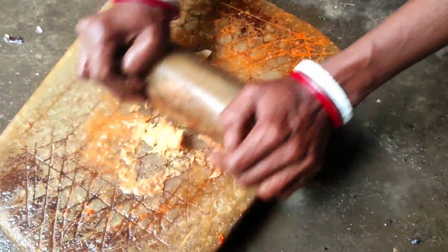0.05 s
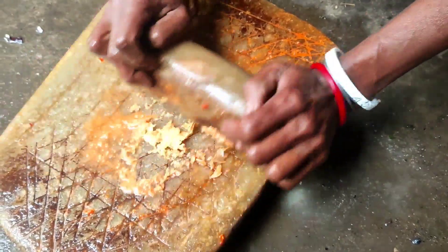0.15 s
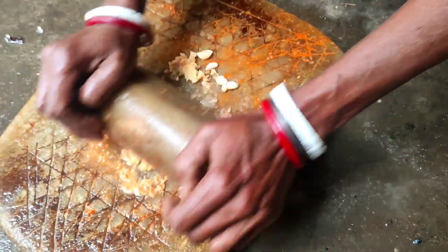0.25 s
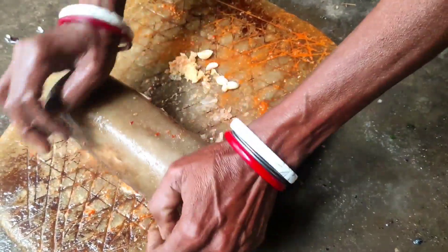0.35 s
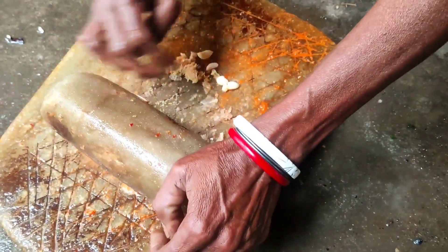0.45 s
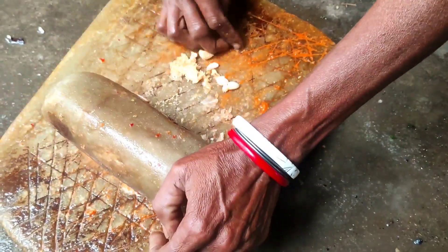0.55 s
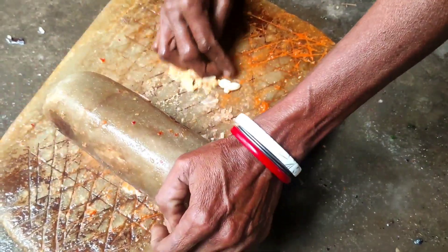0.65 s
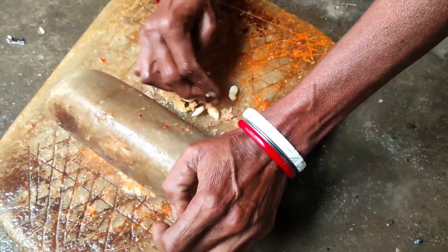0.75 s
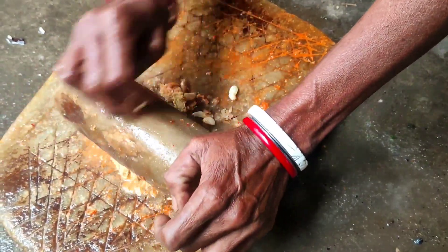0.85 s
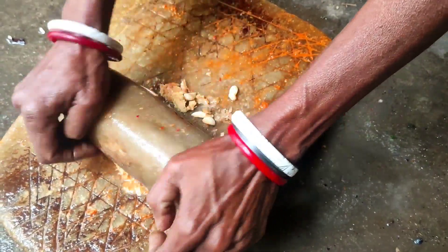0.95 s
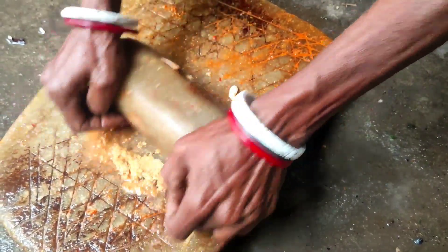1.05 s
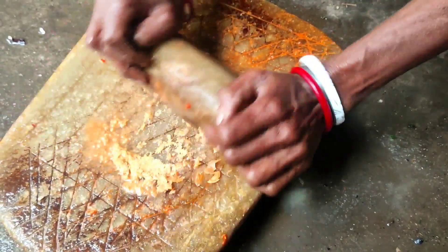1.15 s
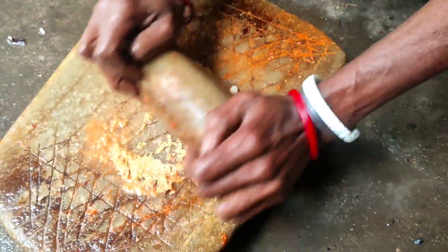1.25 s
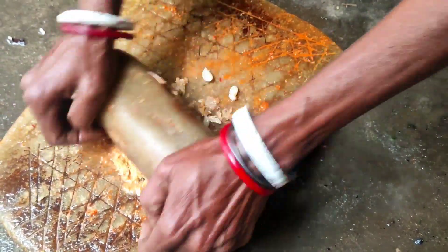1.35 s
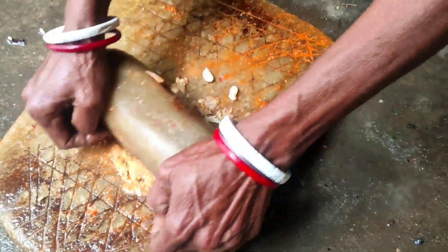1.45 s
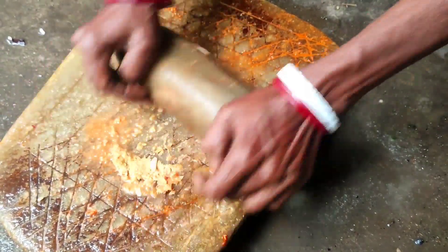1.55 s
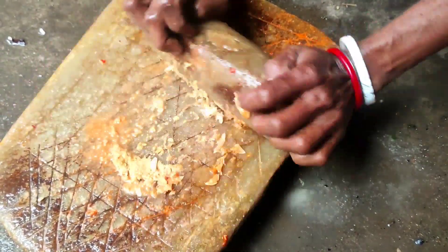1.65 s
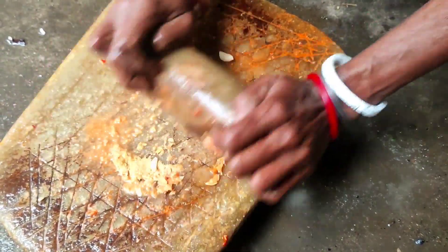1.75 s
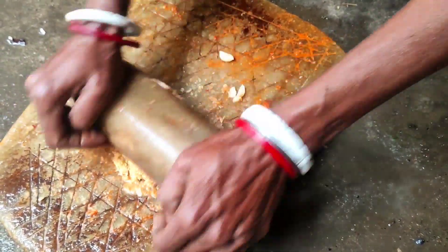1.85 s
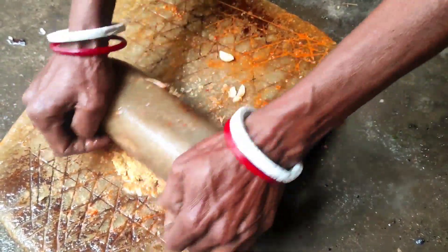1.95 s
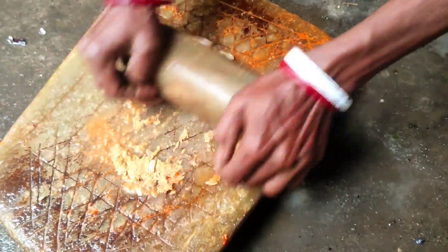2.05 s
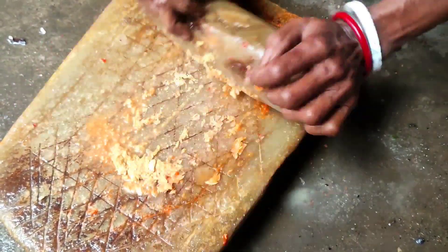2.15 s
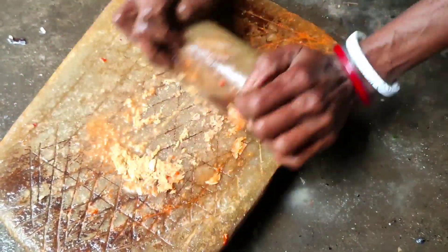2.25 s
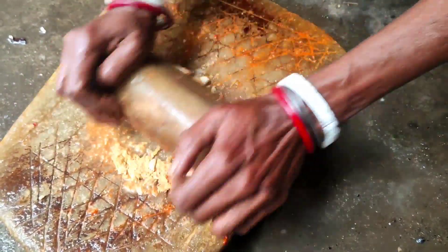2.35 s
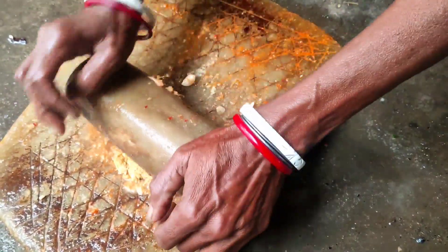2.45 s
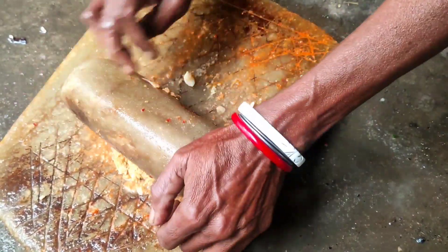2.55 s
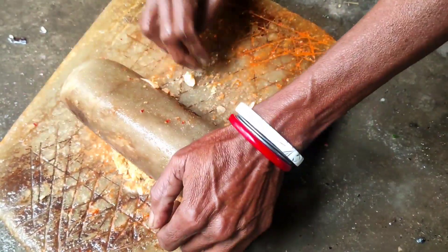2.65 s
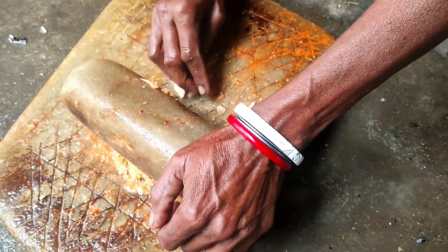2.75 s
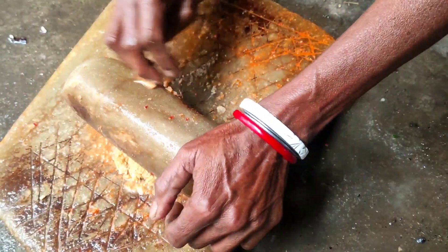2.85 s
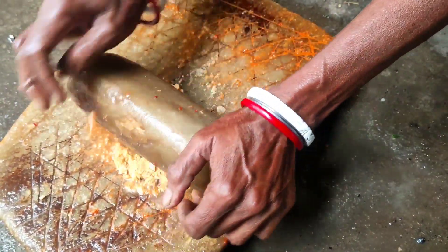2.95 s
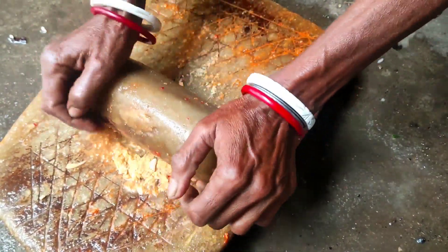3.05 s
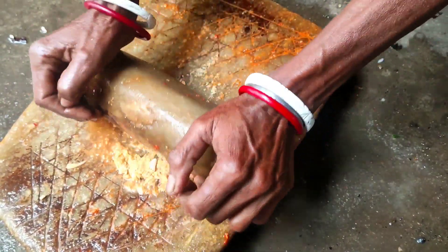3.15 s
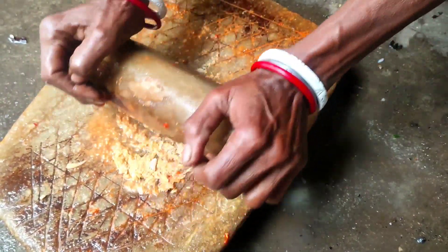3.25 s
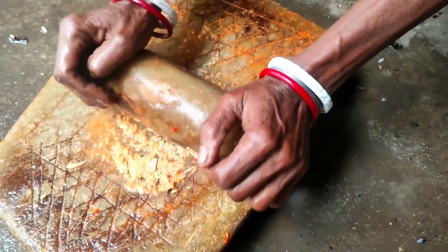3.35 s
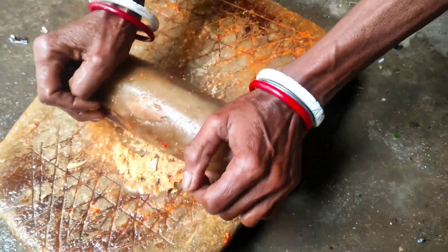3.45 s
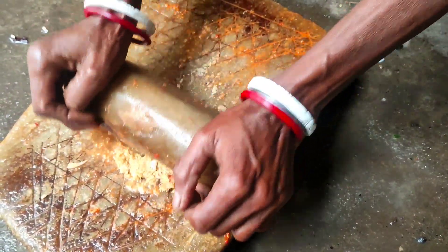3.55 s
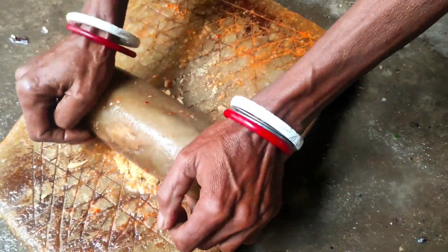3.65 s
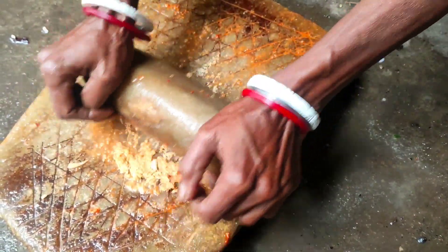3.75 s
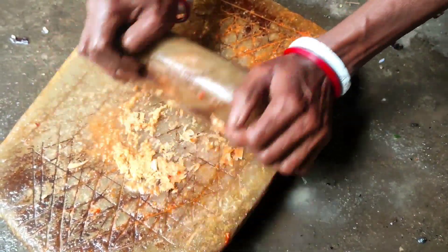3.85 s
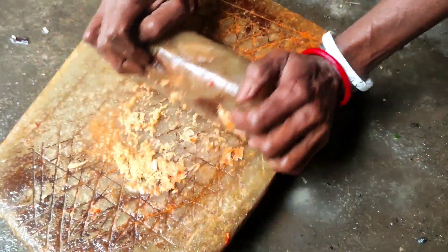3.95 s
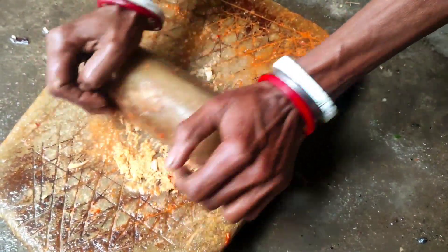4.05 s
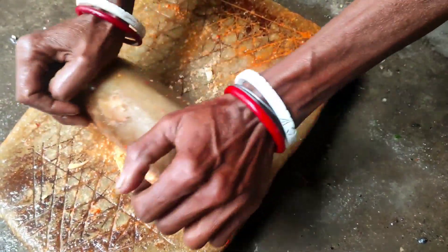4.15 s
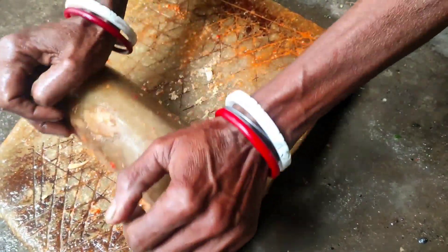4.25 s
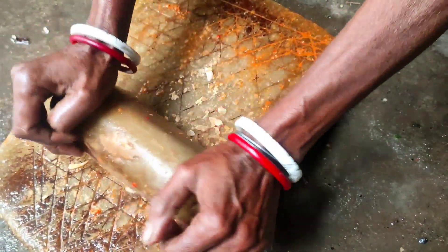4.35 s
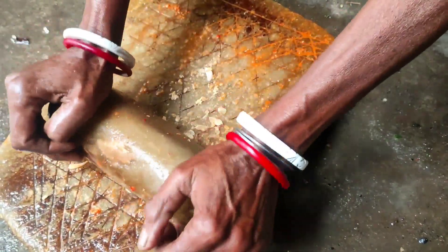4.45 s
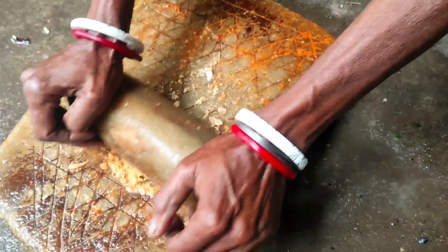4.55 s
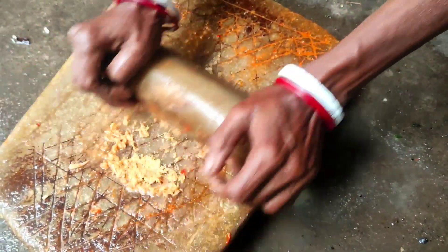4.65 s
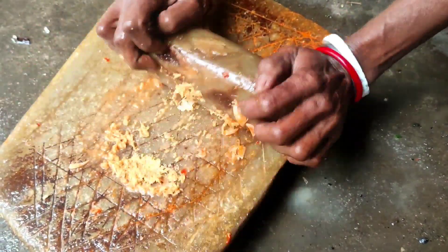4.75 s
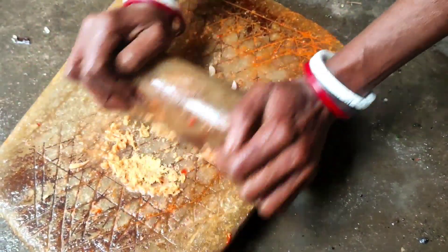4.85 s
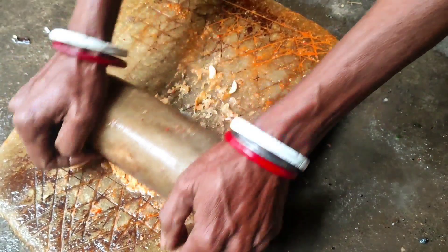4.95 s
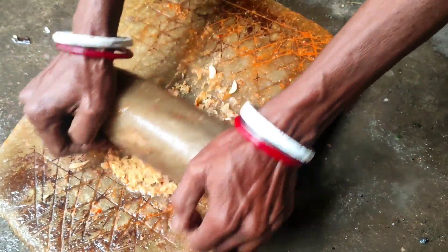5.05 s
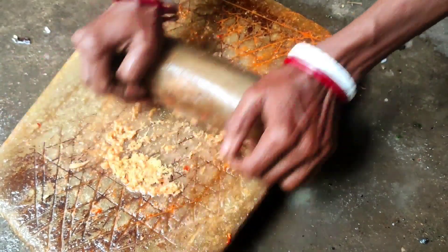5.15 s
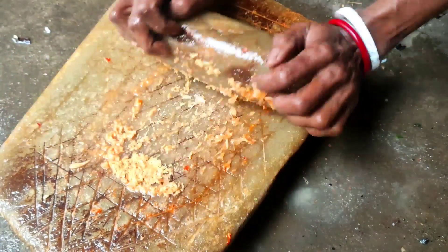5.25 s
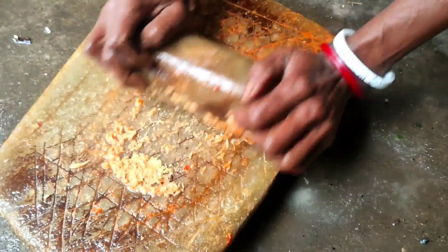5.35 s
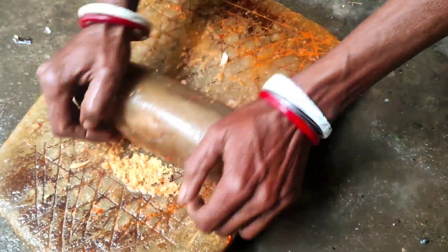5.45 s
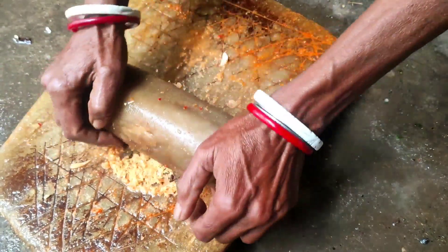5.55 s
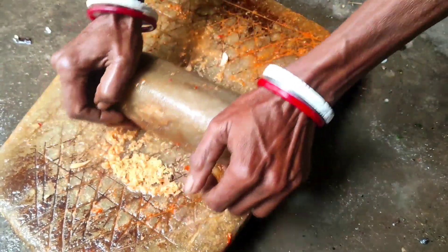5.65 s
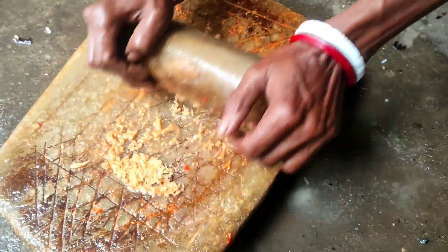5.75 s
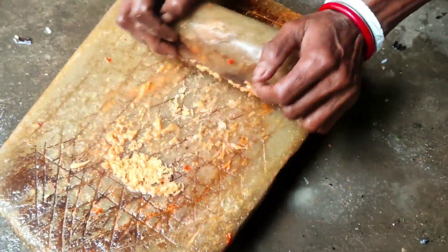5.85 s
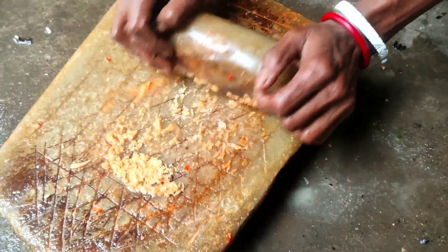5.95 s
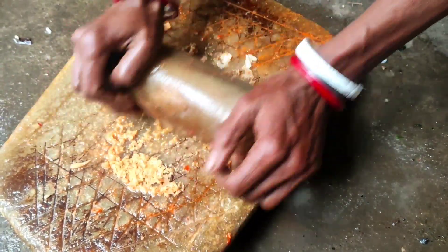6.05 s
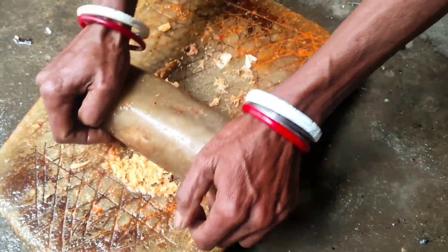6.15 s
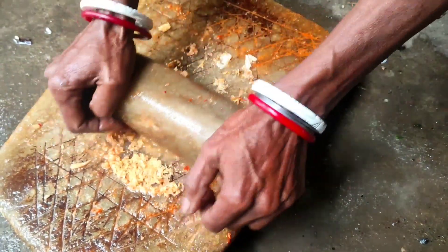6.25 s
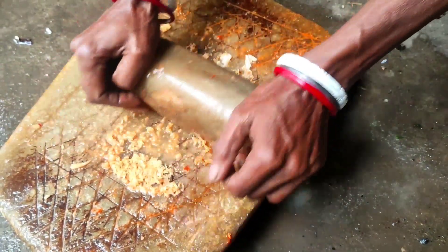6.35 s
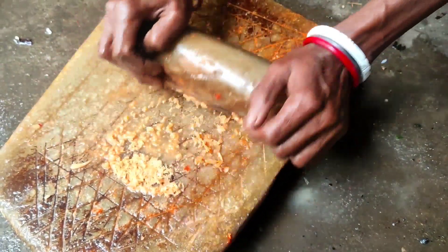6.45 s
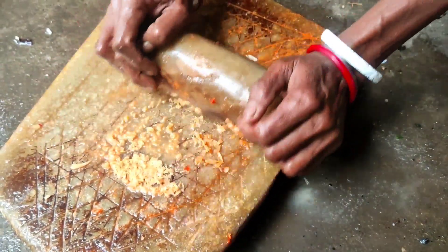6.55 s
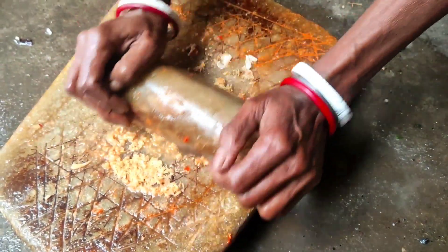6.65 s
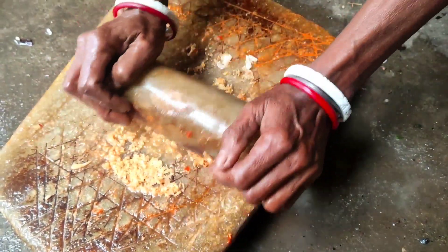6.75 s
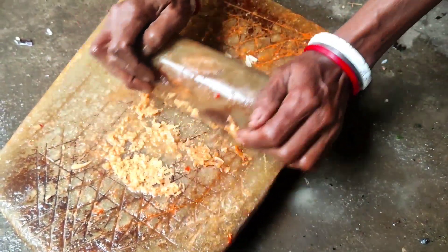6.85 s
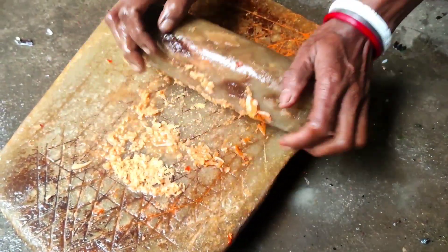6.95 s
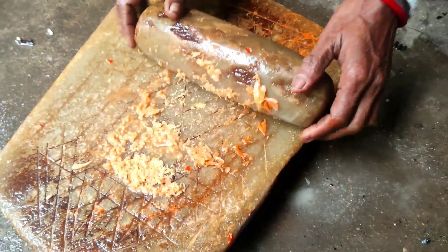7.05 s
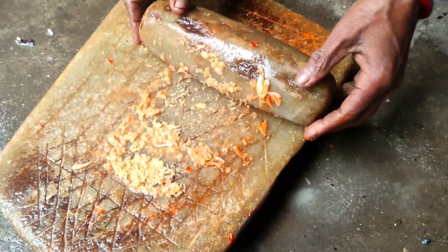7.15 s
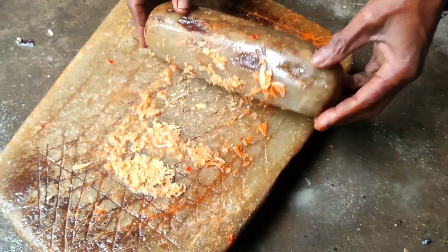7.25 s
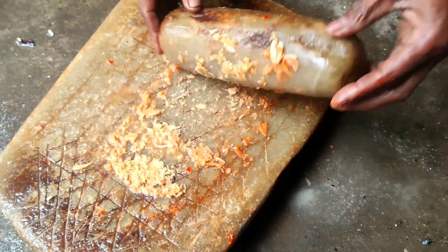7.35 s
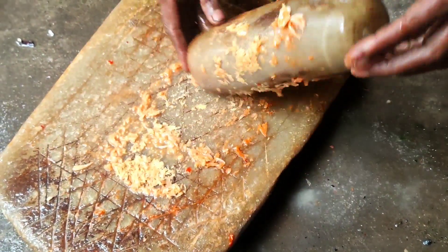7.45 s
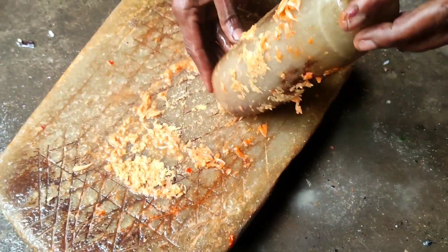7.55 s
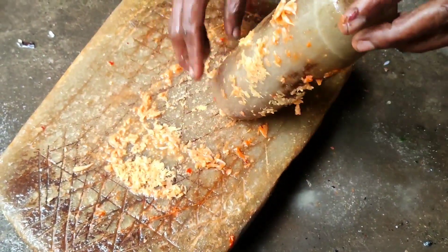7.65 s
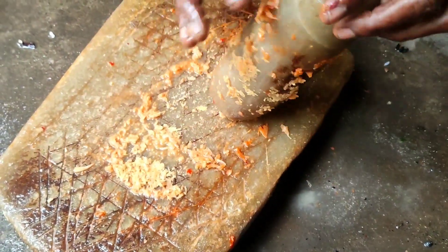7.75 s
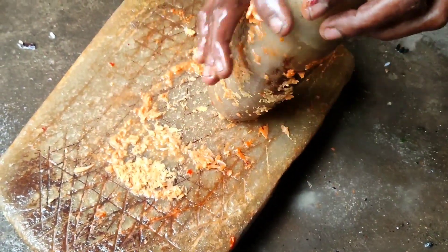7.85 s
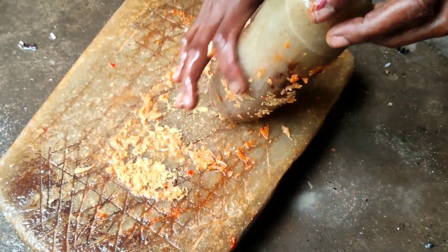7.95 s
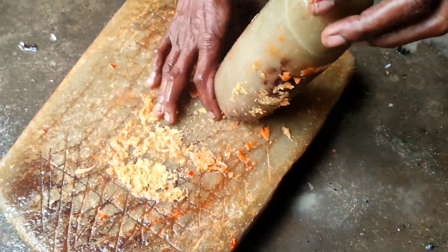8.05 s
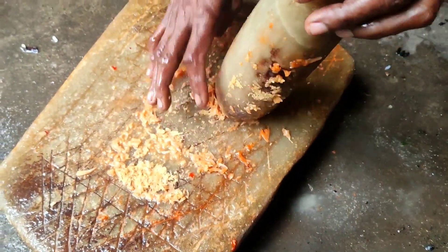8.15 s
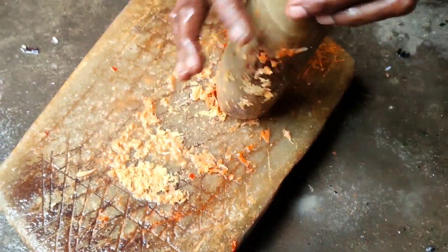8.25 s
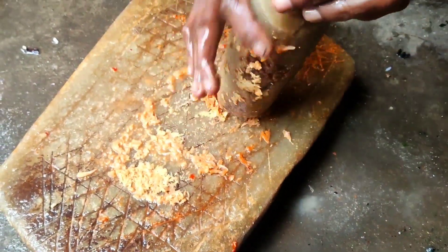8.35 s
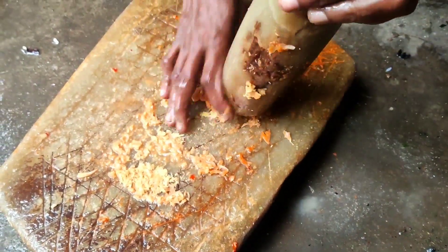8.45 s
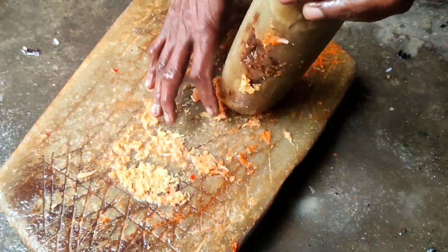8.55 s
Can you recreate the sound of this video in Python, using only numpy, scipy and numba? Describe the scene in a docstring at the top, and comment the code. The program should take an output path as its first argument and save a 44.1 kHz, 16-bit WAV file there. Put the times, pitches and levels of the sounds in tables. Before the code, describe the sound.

Close stereo pickup of spices being crushed on a stone slab in a small kitchen. A soft hiss and faint scrape open, then short dry stone clacks come unevenly, with gritty rubbing between them and thin bright rattles of bangles. The hardest knocks fall in the first half; later the wet grinding grows longer and fuller, with a few isolated clacks.

```python
"""A soft room hiss is heard first, with a faint scrape already under way in it.
Then a stone roller, pushed to and fro over a grooved stone slab on a kitchen floor, knocks down on the
slab, bumps over lumps of spice and scrapes through wet grit; bangles rattle on both wrists.
Knocks are damped wavelets that ring stone modes, the scrape is dense clicks through spectra and moving
resonances, the bangles are swarms of ticks through narrow modes; two spaced ports hear them close by."""
import sys
import numpy as np
from scipy import signal
from scipy.fft import rfft, irfft, next_fast_len
from scipy.io import wavfile
from numba import njit

SR = 44100
rng = np.random.default_rng(int(sys.argv[2]) if len(sys.argv) > 2 else 0)


def to_wav(sig):
    """Store sig (one row per channel, or 1-D mono) as 16-bit WAV at the path in sys.argv[1].

    Samples outside -1..1 are clipped; the rate is SR.
    """
    pcm = np.clip(np.atleast_2d(sig), -1, 1) * 32767
    pcm = np.round(pcm).astype(np.int16)
    wavfile.write(sys.argv[1], SR, pcm.T)  # frames by channels


N = 379260   # length of the scene [samples]


def amp(db):
    """Logarithmic level: decibels to amplitude gain."""
    return 10 ** (np.asarray(db) / 20)


def rms_one(x):
    """Normalisation of power: scale to unit rms."""
    return x / np.sqrt(np.mean(x ** 2) + 1e-20)


def at_hz(points, hz):
    """Interpolation of a frequency table on a logarithmic axis."""
    points = np.array(points)
    return np.interp(np.log(hz + 1), np.log(points[:, 0]), points[:, 1])


def fft_grid(length):
    """Discrete spectrum: a fast transform size and the frequency of each bin [Hz]."""
    size = next_fast_len(length)
    return size, np.arange(size // 2 + 1) * SR / size


def colour(x, spectrum):
    """Linear filtering: weight a noise-like signal by a spectrum, then set its rms to 1."""
    size, hz = fft_grid(N)
    return rms_one(irfft(rfft(x, size) * amp(at_hz(spectrum, hz)), size)[..., :N])


def drift(rate_hz):
    """Low-pass random process: two equal poles on noise at every 40th sample, spread 1."""
    pole = np.exp(-80 * np.pi * rate_hz / SR)
    noise = rng.standard_normal(N // 40 + 2002)
    slow = signal.lfilter([1], [1, -2 * pole, pole * pole], noise)[2000:]
    return np.interp(np.arange(N) / 40, np.arange(len(slow)), rms_one(slow))


def grains(per_s, spread_db):
    """Shot noise: random clicks of uneven size and sign, rms 1."""
    sizes = amp(spread_db * np.minimum(rng.exponential(1, N), 5)) * rng.choice([-1, 1], N)
    return rms_one(sizes * (rng.random(N) < per_s / SR))


def scattered(make, alike):
    """Partial coherence: each port hears a common part and a part of its own."""
    alike = np.clip(alike, 0, 1)
    return np.sqrt(alike) * make() + np.sqrt(1 - alike) * np.array([make(), make()])


@njit
def resonate(x, hz, width_hz, sr):
    """Damped oscillator: a resonance whose centre and width may move, with peak gain 1."""
    y = np.zeros(len(x))
    for i in range(2, len(x)):
        r = np.exp(-np.pi * width_hz[i] / sr)
        drive = (1 - r * r) / 2 * (x[i] - x[i - 2])
        y[i] = drive + 2 * r * np.cos(2 * np.pi * hz[i] / sr) * y[i - 1] - r * r * y[i - 2]
    return y


def steady_resonance(x, hz, width_hz):
    """Constant damping: a resonance whose pitch may move while its width stays."""
    return resonate(x, hz, np.full(N, float(width_hz)), SR)


def add(out, s, sound, pan_db):
    """Superposition: place a sound in both channels, pan_db louder on the left."""
    i = round(s * SR)
    panned = amp([[pan_db / 2], [-pan_db / 2]]) * sound
    out[:, i:i + len(sound)] += panned[:, :N - i]


# Spectrum of the room hiss: (frequency [Hz], relative density [dB per Hz])
HISS_SPECTRUM = [(20, 30), (60, 3), (200, 1), (427, -2.5), (775, -6.5), (1100, -10), (1940, -6),
                 (3520, -9.5), (4250, -8.5), (7110, -13), (8140, -22.5), (14000, -24), (16000, -39.5)]
# Correlation of the hiss between the ports: (frequency [Hz], left-right likeness [1])
HISS_LIKENESS = [(50, 1), (400, 0.94), (1500, 0.12), (5000, 0.036)]
HISS_DB = -44.5   # mean level about which the hiss drifts


def hiss():
    """Diffuse field: noise for room air and far household hum, alike in both ports only in the bass."""
    size, hz = fft_grid(N)
    alike = np.clip(at_hz(HISS_LIKENESS, hz), 0, 1)
    mid, side = rfft(rng.standard_normal((2, size)))
    spectra = np.sqrt(1 + alike) * mid + np.sqrt(1 - alike) * side * [[1], [-1]]
    pair = irfft(spectra, size)[:, :N]
    return amp(HISS_DB + 1.6 * drift(4.8)) * colour(pair, HISS_SPECTRUM)


# Decay of the room's reflections: (frequency [Hz], reverberation time [s])
ROOM_T60 = [(100, 1), (700, 0.55), (2000, 0.44), (5000, 0.26), (12000, 0.28)]


def room(x):
    """Reverberation: dense noise that decays exponentially band by band, its own in each port."""
    size, hz = fft_grid(N + SR)
    t = np.arange(SR) / SR
    noise = rng.standard_normal((2, SR)) * np.clip(t / 0.03, 0, 1) ** 2   # builds up over 30 ms
    walls = 0
    for k, (_, t60) in enumerate(ROOM_T60):
        # each band fades into its neighbours
        share = at_hz([(other_hz, j == k) for j, (other_hz, _) in enumerate(ROOM_T60)], hz)
        walls = walls + share * rfft(noise * amp(-60 * t / max(t60, .05)), size)
    return irfft(rfft(x.mean(axis=0), size) * walls, size)[:, :N]


def in_time(rows):
    """Interpolation in time: columns of a curve at every sample."""
    s, *columns = np.transpose(rows)
    return [np.interp(np.arange(N) / SR, s, c) for c in columns]


def gliding(slips, rows, width_hz, widens):
    """Moving resonance: slips pass twice through a flickering pitch, at the level of its curve."""
    hz, db = in_time(rows)
    hz = hz * amp(widens * 2 * drift(24))
    width_hz = width_hz + widens * hz
    once = resonate(slips, hz, width_hz, SR)
    twice = resonate(once, hz, width_hz, SR) / np.sqrt(width_hz)
    return rms_one(twice) * amp(db + 1.2 * drift(30))


# A thin faint tone that comes and goes in the pauses:
# (time [s], pitch [Hz], level before the port gain [dB])
THIN_TONE = [(.48, 1450, -75), (.57, 1370, -46.5), (0.638, 1330, -61), (1.0, 1340, -67.5),
             (1.1, 1340, -95.5), (4.3, 550, -94), (4.35, 528, -55.5), (4.44, 556, -68), (4.46, 550, -91)]


def thin_tone(slips):
    """Resonance of fixed width: the slips sound a faint tone in the pauses."""
    return gliding(slips, THIN_TONE, 150, 0)


# The wedge of air under the roller: (time [s], pitch [Hz], level relative to the grind [dB])
AIR_WEDGE = [(0.06, 1400, -2.5), (.3, 1400, -37), (2.86, 1090, -20), (2.9, 1120, -14), (2.98, 1480, 1),
             (3.1, 2070, -21), (4.75, 1980, 1), (4.8, 1940, 1.5), (4.93, 1490, -22), (5.04, 1330, -1),
             (5.1, 962, -2), (5.135, 760, 0.5), (5.16, 543, -2.5), (5.2, 940, -6), (5.235, 772, 4.5),
             (5.26, 580, 0.5), (5.5, 705, -16), (6.2, 784, -19), (6.39, 730, -12), (6.45, 1050, 1.5),
             (6.49, 1300, -9), (6.6, 1285, -6), (6.62, 750, -5), (6.67, 570, -4), (6.75, 590, -4),
             (7.3, 890, -26), (7.661, 1400, -10), (7.8, 1200, -4.5), (7.85, 820, -11.5), (7.97, 880, 8),
             (8.1, 790, 0.5)]
# A higher resonance of the rub, which comes and goes:
# (time [s], pitch [Hz], level relative to the grind [dB])
UPPER_RESONANCE = [(4.9, 1980, -28), (4.95, 2060, -22), (5.05, 1760, 2.5), (5.12, 2030, -13),
                   (6.2, 2280, -10), (6.31, 2250, -2.5), (6.4, 2010, -9), (6.53, 2470, 0.5), (6.6, 2490, 6),
                   (6.68, 2350, -8), (7.28, 2000, -3.5), (7.66, 1920, -4), (7.72, 1830, 3.5),
                   (7.77, 1920, -12), (7.9, 2070, -19)]
WEDGE_WIDTH_HZ, WEDGE_WIDENS = 170, .12   # width at no pitch; its growth per Hz, also the pitch flicker


def air_wedge(slips):
    """Cavity resonance: slips excite two pitches that glide with time."""
    return sum(gliding(slips, rows, WEDGE_WIDTH_HZ, WEDGE_WIDENS) for rows in (AIR_WEDGE, UPPER_RESONANCE))


def stone_hum(slips):
    """Modal excitation by friction: the rub wanders over the slab, so each mode comes and goes."""
    hum = np.zeros(N)
    for hz, _, _, _ in STONE_MODES[2:]:
        pitch_hz = hz * amp(0.083 * drift(2.0))
        hum += amp(5 * drift(13.1)) * steady_resonance(slips, pitch_hz, 50)
    return amp(-10) * rms_one(hum)


# Strokes of the roller: (start [s], length [s], hardest push [share of length],
# relative grind level [dB], relative grit level [dB])
STROKES = [(-0.15, 0.94, 0.12, -56.5, -52.5), (0.258, 0.6, 0.25, -52.5, -64),
           (1.055, 0.29, 0.52, -41.5, -52), (1.217, 0.83, 0.16, -58, -56), (1.593, 0.69, 0.8, -49, -47.5),
           (2.263, 0.56, 0.07, -49, -78), (2.855, 0.58, 0.24, -55.5, -62), (3.41, 0.17, 0.14, -43, -56.5),
           (3.661, 0.37, 0.35, -50.5, -52), (4.439, 0.37, 0.063, -41, -48.5), (4.653, 1, 0.28, -44, -49),
           (5.976, 0.6, 0.53, -44.5, -49.5), (6.296, 0.54, 0.45, -43, -45), (7.24, 0.76, 0.46, -44, -50.5),
           (7.592, 0.4, 0.31, -40, -50), (8.46, 0.3, 0.52, -53.5, -58.5)]
GRIND_SWELL, GRIT_SWELL = 1.65, 1   # exponents: how pointed the rise and fall of a stroke is
IDLE_GRIND_DB, IDLE_GRIT_DB = -68.5, -69   # hands and roller shifting between strokes


def strokes():
    """Addition of powers: each push swells and eases off over a faint idle shuffle; gives gains."""
    t = np.arange(N) / SR
    grind_power, grit_power = amp(2 * IDLE_GRIND_DB), amp(2 * IDLE_GRIT_DB)
    for s, length_s, hardest, grind_db, grit_db in STROKES:
        peak_s = s + np.clip(hardest, .05, .95) * length_s
        push = np.sin(np.pi / 2 * np.interp(t, [s, peak_s, s + length_s], [0, 1, 0])) ** 2
        grind_power = grind_power + amp(2 * grind_db) * push ** GRIND_SWELL
        grit_power = grit_power + amp(2 * grit_db) * push ** GRIT_SWELL
    return np.sqrt(grind_power), np.sqrt(grit_power)


def patchy(x):
    """Band-wise modulation: four treble bands swell and thin, each on its own."""
    edges_hz = [1000, 2500, 4000, 6000, 16000]
    out = 0
    for k, band in enumerate(zip(edges_hz, edges_hz[1:])):
        sos = signal.butter(2, band, "band", fs=SR, output="sos")
        # alternate signs let neighbours join
        out = out + (-1) ** k * amp(2.0 * drift(10.4)) * signal.sosfilt(sos, x)
    return out


# Spectrum of the low grind: (frequency [Hz], relative density [dB per Hz])
GRIND_SPECTRUM = [(100, -61), (180, -22.5), (600, -4.5), (1800, -0.5), (3000, -2.5), (4500, -14),
                  (8000, -66)]
# Spectrum of the fine wet crunch: (frequency [Hz], relative density [dB per Hz])
GRIT_SPECTRUM = [(1500, -42), (2900, -7.5), (4200, 2), (5200, -5.5), (6800, -4.5), (10000, -17.5),
                 (14000, -27)]


def scrape():
    """Stick-slip friction: dense slips make a grind that sounds air wedge and stone, and a fine crunch."""
    grind_gain, grit_gain = strokes()
    judder = drift(20)   # the roller catches on the grooves
    slips = grains(2500, spread_db=2.2)
    rub = colour(scattered(lambda: grains(3000, spread_db=2.0), 0.49), GRIND_SPECTRUM)
    grind = rub + air_wedge(slips) + stone_hum(slips)
    grind = grind * grind_gain * amp(1.3 * judder + 1.5 * drift(70))
    crunch = colour(scattered(lambda: grains(6000, spread_db=2.5), 0.076), GRIT_SPECTRUM)
    grit = patchy(crunch) * grit_gain * amp(1.2 * judder)
    return (grind + grit + thin_tone(slips)) * amp(0) * np.array(amp([[.6], [-.6]]))   # pan in dB


# Spectrum of the bangles' ticks: (frequency [Hz], relative density [dB per Hz])
TICK_SPECTRUM = [(880, -39), (1500, 9.5), (1870, -10.5), (2690, 11.5), (6760, 4), (12400, -8),
                 (16000, -10.5)]
# Bangles clash: (time [s], relative level [dB], dying away [s], brightness [dB])
CLASHES = [(0.363, -41, 0.083, -2), (0.387, -33, 0.021, 12), (0.6764, -49.5, 0.052, -5),
           (1.059, -45.5, 0.021, 3), (1.163, -30, 0.032, -4.5), (1.239, -28.5, 0.064, -8.5),
           (1.466, -33.5, 0.023, 14.5), (1.485, -36.5, 0.016, 7), (1.746, -32.5, 0.04, -5),
           (1.945, -39, 0.06, 12.5), (2.243, -35, 0.012, 0), (2.385, -34, 0.063, -6),
           (2.458, -39.5, 0.03, 0), (2.481, -43, 0.022, 18.5), (2.879, -44, 0.03, -4),
           (3.009, -34.5, 0.058, -11), (3.2274, -45, 0.013, 5), (3.4286, -34.5, 0.023, -4),
           (3.5707, -39.5, 0.015, 7.5), (3.672, -31, 0.028, -4), (4.0073, -33.5, 0.019, -1.5),
           (4.111, -42.5, 0.16, 1), (4.179, -35, 0.02, 7.5), (4.197, -31.5, 0.0094, 7),
           (4.4499, -20, 0.0075, -13), (4.63, -33, 0.019, 9.5), (4.8487, -43.5, 0.018, 10.5),
           (4.934, -39, 0.022, 5.5), (5.034, -36.5, 0.023, 5), (5.053, -33, 0.013, 12.5),
           (5.34, -35, 0.013, 5), (5.55, -34.5, 0.04, 7.5), (5.788, -47.5, 0.006, 5),
           (5.9658, -23.5, 0.0011, -3), (6.061, -40, 0.0049, 1), (6.216, -29.5, 0.014, 7.5),
           (6.635, -34, 0.018, -5.5), (6.779, -39.5, 0.021, 8), (6.802, -41.5, 0.05, -3),
           (7.256, -47.5, 0.022, 9), (7.5656, -37, 0.047, -40), (8.032, -45, 0.022, 4.5),
           (8.095, -47, 0.023, -14), (8.1374, -43.5, 0.0072, -8)]
# Ringing modes of the bangles: (frequency [Hz], width [Hz], relative level [dB])
BANGLE_MODES = [(4105, 52, 2.5), (5550, 21, 10), (6220, 58, 13), (6420, 40, 9.5), (6990, 64, 12.5),
                (9510, 120, -4.5), (10700, 130, -7.5), (12180, 310, 0.5),]
WRISTS_PAN_DB = 2   # left minus right
MELLOW_RING = 0.28   # dB gained by modes between 5 and 7.2 kHz for each dB that a clash is duller
FAVOUR_DB, SWING_DB = 5, .15   # spread of mode strength; of pitch, as bangles hang and touch differently


def bangles():
    """Impact-excited modes: each clash is a swarm of ticks around a sharp touch that rings the bangles."""
    source = scattered(lambda: grains(5000, spread_db=1.0), 0.29)
    ticks = colour(source, TICK_SPECTRUM) * amp(2.0 * drift(79))
    low = signal.sosfilt(signal.butter(4, 8500, fs=SR, output="sos"), ticks)
    high = signal.sosfilt(signal.butter(4, 8500, "high", fs=SR, output="sos"), ticks)
    dull, bright, mellow = np.zeros((3, 2, N))   # envelopes
    t = np.arange(-SR // 20, SR // 4) / SR
    touch = 0.6 * (t >= 0) * np.exp(-np.abs(t) / 0.0017)
    for s, db, fall_s, bright_db in CLASHES:
        fall_s = max(fall_s, .001)
        swell = touch + np.exp(np.where(t < 0, t / (0.28 * fall_s), -t / fall_s))
        mellow_db = db - 18.5 - MELLOW_RING * max(bright_db, -15)
        add(dull, s + t[0], amp(db - 9.5) * swell, WRISTS_PAN_DB)
        add(bright, s + t[0], amp(db - 3.5 + bright_db) * swell, WRISTS_PAN_DB)
        add(mellow, s + t[0], amp(mellow_db) * swell, WRISTS_PAN_DB)
    swarm = dull * low + bright * high
    out = swarm.copy()
    for hz, width_hz, db in BANGLE_MODES:
        exciter = mellow * low if 5000 < hz < 7200 else swarm
        struck = exciter * amp(db + 6.0 + FAVOUR_DB * drift(4.1))   # each clash favours other modes
        pitch_hz = hz * amp(SWING_DB * drift(4.0))
        out += [steady_resonance(port, pitch_hz, width_hz) for port in struck]
    return out


def wavelet(t, hz, damping):
    """Damped pulse: a few cycles that rise and die, without a net push; height 1."""
    shape = np.gradient(np.cos(2 * np.pi * hz * t) * (t * hz) ** 2 * np.exp(-2 * damping * t * hz))
    return -shape / np.abs(shape).max()


# Crowded modes of slab and roller, the low set off by the knock, the high by the clack:
# (frequency [Hz], crowd width [Hz], relative level [dB], reverberation time before added damping [s])
STONE_MODES = [(329, 70, -29.5, 0.16), (466, 91, -24.5, 0.13), (724.5, 82, -15, 0.097),
               (880, 73, -17, 0.058), (1400, 240, -15, 0.022), (1775, 39, -12.5, 0.025),
               (2078, 160, -22.5, 0.36), (2207, 65, -18.5, 0.056), (2374, 160, -14, 0.019),
               (2830, 58, -40, 0.061), (3610, 78, -44, 0.037)]
PARTIALS = 9   # in each crowd
AWAY_DB = 10   # a high mode loses this much for each octave from the clack's pitch
RING_RISE_S = 0.00089   # the modes build up behind the contact


def ringing(t, knock_db, clack_db, clack_hz):
    """Modal superposition: each crowd is nine scattered partials, scaled to the crowd's own strength."""
    hz, width_hz = np.repeat(np.transpose(STONE_MODES)[:2], PARTIALS, axis=1)[:, :, None]
    places = np.tile(np.linspace(-1, 1, PARTIALS), len(STONE_MODES))
    places = places + (rng.random(len(places)) - .5) / 4
    size, side = rng.random((2, len(hz), 1))
    partial_hz = hz + width_hz * places[:, None]
    partial = (1.7 + 0.1 * size) * np.sign(side - .5) * np.sin(2 * np.pi * partial_hz * t)
    crowds = partial.reshape(len(STONE_MODES), PARTIALS, -1).sum(axis=1)
    crowds = crowds / np.std(crowds[:, :SR // 12], axis=1, keepdims=True)
    hz, _, db, t60 = np.transpose(STONE_MODES)[:, :, None]
    high_db = clack_db - AWAY_DB * np.abs(np.log2(hz / clack_hz))
    struck_db = np.where(hz < 1100, knock_db, high_db)
    crowds = crowds * amp(db + struck_db - 60 * t / t60)
    # hands and paste damp the first ms hardest
    damping = 0.5 + np.exp(-t / 0.023)
    return crowds.sum(axis=0) * damping * (1 - np.exp(-(t / RING_RISE_S) ** 2))


def chatter(t, chatter_s):
    """Repeated impact: a first touch, weaker the longer the chatter, then a dying run of random ones."""
    chatter_s = max(chatter_s, .001)
    happens, strength = rng.random((2, len(t)))
    run = min(chatter_s / 0.034, 1.2) * np.exp(-(t / chatter_s) ** 2 / 2)
    touches = (happens < 1500 / SR) * (2 * strength - 1) * run
    touches[0] = 1 - min(chatter_s / 0.04, .85)
    touches[round(.0135 * SR)] += 0.21 * touches[0]   # a near wall throws the blow back
    return touches


# Roller on slab, levels before chatter shares them out: (time [s], knock level [dB],
# clack level [dB], clack pitch [Hz], thud level [dB], chatter [s])
KNOCKS = [(0.0639, -64, -32.5, 1620, -73, 0.019), (0.2792, -44.5, -46, 1550, -50, 0.018),
          (0.492, -63, -45, 1590, -57, 0.036), (1.1014, -26.5, -32.5, 1440, -42.5, 0.04),
          (1.145, -36, -47.5, 1860, -66, 0.034), (1.24, -9.5, -6.5, 1690, -21, 0.008),
          (1.5931, -33.5, -38.5, 1510, -42, 0.028), (1.6285, -27, -32, 1330, -31.5, 0.01),
          (1.7013, -10.5, -7.5, 1350, -22.5, 0.00092), (1.8385, -19, -3, 1690, -31, 0.0031),
          (2.134, -15, -15, 1744, -30, 0.0092), (2.202, -27, -27.5, 1620, -37.5, 0.024),
          (2.2908, -12, 3.5, 1850, -19.5, 0.0068), (2.3011, -15.5, -7, 1980, -45, 0.0068),
          (2.382, -40.5, -31, 1920, -48.5, 0.047), (2.8706, -54, -33, 1110, -71, 0.019),
          (3.017, -63, -21.5, 1720, -73, 0.015), (3.169, -47, -62, 1800, -27, 0.014),
          (3.4404, -12.5, -3.5, 1380, -21, 0.0055), (3.6695, -41, -31, 2200, -36.5, 0.019),
          (3.985, -18.5, -15, 1400, -28, 0.003), (4.13, -25.5, -27, 1260, -35, 0.004),
          (4.1677, -30.5, -31, 1390, -36, 0.018), (4.4486, -4, 3, 1630, -21.5, 0.004),
          (4.4641, -40, -10, 2000, -33, 0.002), (4.4755, -44, -19, 2100, -48, 0.0067),
          (4.876, -42, -55, 1500, -38, 0.011), (5.427, -36, -33.5, 1470, -45, 0.026),
          (5.9661, -19, 0.5, 1390, -24.5, 0.0009), (5.979, -40, -27, 2000, -46, 0.004),
          (6.0595, -52, -21, 2020, -43, 0.016), (6.12, -53, -60, 1500, -36, 0.0089),
          (6.9542, -17, -6.5, 1790, -24.5, 0.0087), (7.5841, -27.5, -30, 1640, -28, 0.0077)]
CLACK_DAMPING = 1.55
CRACK_DB = -3   # relative to the clack


def knocks():
    """Contact impact: thud, knock, clack and crack, repeated by chatter; every blow rings the stone."""
    out, t = np.zeros((2, N)), np.arange(SR // 3) / SR
    bright = signal.butter(2, [2800, 4500], "band", fs=SR, output="sos")
    for s, knock_db, clack_db, clack_hz, thud_db, chatter_s in KNOCKS:
        knock = amp(knock_db) * wavelet(t, 1075.0 / (1 + 10.0 * chatter_s), 1.29)
        clack = amp(clack_db) * wavelet(t, clack_hz, CLACK_DAMPING)
        thud = amp(thud_db) * (wavelet(t, 317.0, 1.62) + 0.14 * wavelet(t, 85.0, 2.46))
        burst = (rng.random(len(t)) - .5) * np.exp(-t / 0.0056)
        crack = amp(CRACK_DB + clack_db) * signal.sosfilt(bright, burst)
        blow = knock + clack + thud + crack + ringing(t, knock_db, clack_db, clack_hz)
        add(out, s, signal.fftconvolve(chatter(t, chatter_s), blow)[:len(t)], 1.1)
    return out


def ports(x, lag):
    """Propagation delay: the left channel lags by a table of (frequency [Hz], delay [ms])."""
    size, hz = fft_grid(N + SR // 10)
    turn = np.exp(-2j * np.pi * hz * at_hz(lag, hz) / 1000)
    late = irfft(rfft(x[0], size) * turn, size)
    return np.array([late[:N], x[1]])


# The left port hears the slab later, the bass most: (frequency [Hz], delay [ms])
SLAB_LAG = [(700, 0.17), (1200, 0.14), (2100, 0.12)]


def scene():
    """Direct and reverberant field: stone and bangles near the ports, the walls, the hiss."""
    stone, wrists = knocks() + scrape(), bangles()
    near = ports(stone, SLAB_LAG) + ports(wrists, [(1000, 0.205)])
    return near + amp(-43) * room(stone + wrists) + hiss()


def record(dry):
    """Amplitude and band limits: the loudest peaks clip; the deep bass and the top are cut."""
    clipped = np.clip(dry, -1, 1)
    thin = signal.sosfilt(signal.butter(2, 105, "high", fs=SR, output="sos"), clipped)
    return signal.sosfilt(signal.cheby2(20, 75, 16500, fs=SR, output="sos"), thin)


dry = scene()
out = record(dry)
to_wav(out)
```